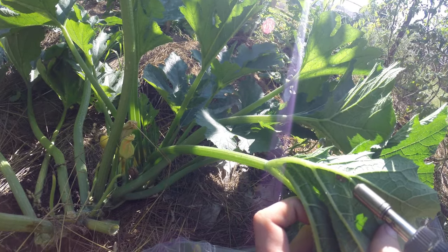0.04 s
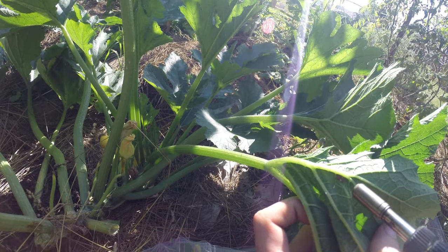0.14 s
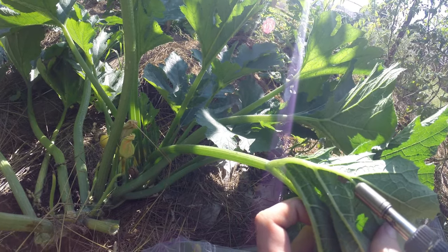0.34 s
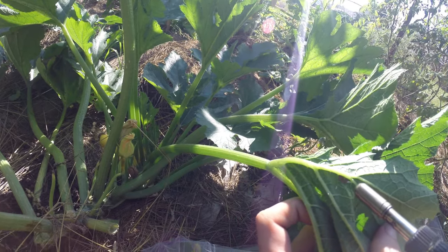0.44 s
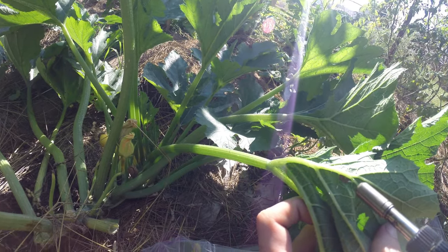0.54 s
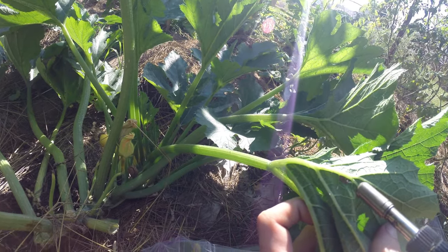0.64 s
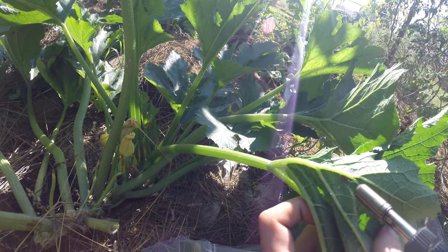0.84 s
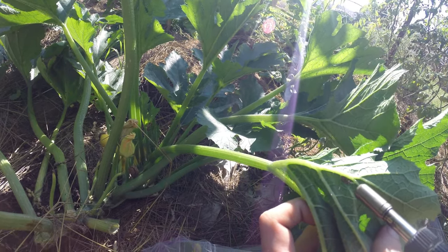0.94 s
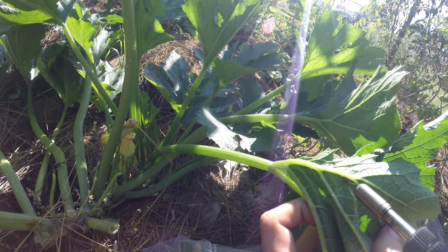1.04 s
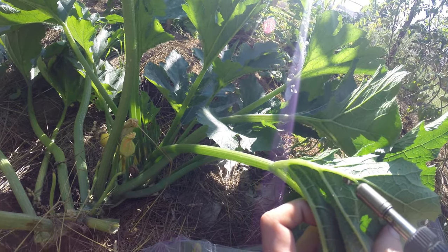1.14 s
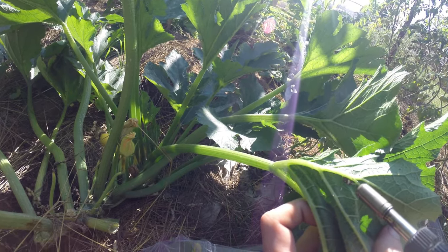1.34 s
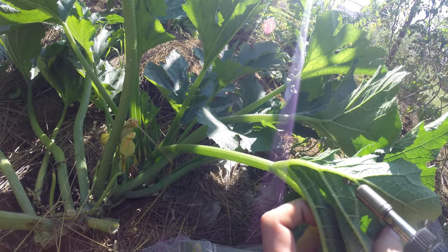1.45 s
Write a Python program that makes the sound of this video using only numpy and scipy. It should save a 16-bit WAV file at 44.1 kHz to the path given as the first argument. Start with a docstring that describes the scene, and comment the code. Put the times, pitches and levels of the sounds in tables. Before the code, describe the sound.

Insect eggs pop under a small gas torch, close and dry in open air. A faint tick at 0.15 s and a tiny rising bubble blip at 0.22 precede a loud crack at 0.35. Soft puffs follow around 0.42, a strong pop at 0.71, a dull puff at 0.8, faint ticks after 1.0, then the loudest tight double snap at 1.24 and a small puff at 1.31. Faint hiss, rumble and wavering hum continue throughout.

```python
"""Insect eggs burst on a garden leaf under a small gas torch: sharp cracks and dull puffs of steam.
Each burst is one prompt click, its spectrum shaped by crack, puff and short resonances.
Open air adds almost no tail; a sine blip rises in pitch, as of boiling sap.
The flame is shaped noise, hissing and roaring faintly throughout.
Below it lie an outdoor rumble of shaped noise and a wavering sine hum."""
import sys
import numpy as np
from scipy import signal
from scipy.fft import rfft, irfft
from scipy.io import wavfile
from scipy.ndimage import uniform_filter1d

SR = 44100
rng = np.random.default_rng(int(sys.argv[2]) if len(sys.argv) > 2 else 0)


def store_pcm(level_fs):
    """Save levels as 16-bit WAV."""
    pcm = np.round(np.clip(level_fs, -1, 1) * 32767).astype(np.int16)
    wavfile.write(sys.argv[1], SR, np.atleast_2d(pcm).T)


N = 66150  # samples, 1.5 s


def amp(db):
    """Decibels to gain."""
    return 10 ** (np.asarray(db) / 20)


def unit(x):
    """Scales to rms 1."""
    return x / np.sqrt(np.mean(x ** 2) + 1e-20)


def spectrum(points, hz):
    """Interpolates dB on a log-frequency axis."""
    point_hz, db = np.transpose(points)
    return np.interp(np.log(hz + 1), np.log(point_hz + 1), db)


def bumps(rows, hz):
    """Summed dB of resonance peaks and dips."""
    return sum(db / (1 + (2 * (hz - center_hz) / width_hz) ** 2) for center_hz, width_hz, db in rows)


def envelope(points, t):
    """Gain over time, interpolated in dB."""
    return amp(np.interp(t, *np.transpose(points)))


def drift(seconds):
    """Smooth random motion of rms 1: white noise averaged twice."""
    size = max(int(seconds * SR), 2)
    once = uniform_filter1d(rng.standard_normal(N), size)
    return unit(uniform_filter1d(once, size))


def noise(db):
    """Noise of rms 1 with the given spectral shape."""
    white = rng.standard_normal(N)
    return unit(irfft(rfft(white) * amp(db), N))


def causal(gain):
    """Minimum-phase spectrum: the most prompt click with this gain."""
    log_gain = np.log(np.maximum(gain, 1e-5))  # floor at -100 dB
    circle = np.concatenate([log_gain, log_gain[-2:0:-1]])
    return np.exp(np.conj(signal.hilbert(circle)))[:len(gain)]


def add(mix, start_s, sound):
    """Mixes a sound in at a time, cut at the end of the mix."""
    part = mix[round(start_s * SR):][:len(sound)]
    part += sound[:len(part)]


# Flame noise shape. Each row: frequency in Hz, relative density in dB.
FLAME_SHAPE = [(200, -11.5), (450, -3), (700, 0.5), (1050, -1.5), (1350, -9.5), (1750, -11), (2300, -18.5),
               (3400, -20), (4800, -15.5), (8200, -18.5), (12000, -22.5), (14500, -21.5), (15100, -34),
               (15600, -61)]
# Torch nozzle resonances and dips. Each row: center in Hz, width in Hz, height in dB.
NOZZLE_RESONANCES = [(3090, 170, 3.5), (3660, 78, 7.5), (4840, 480, 6.5), (5790, 240, 6), (7270, 980, 8.5),
                     (7940, 400, -9), (9330, 1040, 8), (11250, 540, 10), (12400, 400, -7),
                     (12700, 970, 4.5)]
# Gain of the high hiss band. Each row: time in seconds, gain in dB.
HISS_GAIN = [(0, -4.5), (.37, -2.5), (.55, 2), (.95, 2), (1.2, 4.5), (1.5, .2)]
FLAME_DB = -50  # rms before the hiss gain
HISS_HZ, HISS_WIDTH_HZ = 9440, 2100  # Gaussian band, full width at 1/e


def torch():
    """Gas noise coloured by flame and nozzle; the high hiss swells slowly."""
    hz, t = np.fft.rfftfreq(N, 1 / SR), np.arange(N) / SR
    flame = noise(spectrum(FLAME_SHAPE, hz) + bumps(NOZZLE_RESONANCES, hz))
    hiss_band = np.exp(-(2 * (hz - HISS_HZ) / HISS_WIDTH_HZ) ** 2)
    hiss = irfft(rfft(flame) * hiss_band, N)
    roar = flame - hiss
    return amp(FLAME_DB) * (roar + hiss * envelope(HISS_GAIN, t))


# Outdoor rumble shape. Each row: frequency in Hz, relative density in dB.
RUMBLE_SHAPE = [(10, -23), (25, -4), (42, -2), (70, 5), (95, -1), (160, -1.5), (220, -6), (330, -12.5),
                (600, -32), (2000, -55)]
# Hum level. Each row: time in seconds, rms level in dB.
HUM_LEVEL = [(0, -47.5), (.08, -45.5), (.2, -56), (.33, -61), (.45, -47.5), (.8, -51), (.99, -43.5),
             (1.25, -61), (1.4, -47), (1.5, -49.5)]
RUMBLE_DB, OCTAVE_DB = -48.5, -58  # rms
HUM_HZ, HUM_WAVER_RATIO, HUM_WAVER_S = 56.13, 0.0345, .08  # rms ratio, averaging time


def outdoors():
    """Noise rumble, and a sine hum of wavering pitch with a weak steady octave."""
    hz, t = np.fft.rfftfreq(N, 1 / SR), np.arange(N) / SR
    pitch_hz = HUM_HZ * (1 + HUM_WAVER_RATIO * drift(HUM_WAVER_S))
    phase = 2 * np.pi * np.cumsum(pitch_hz) / SR
    fundamental = envelope(HUM_LEVEL, t) * np.sin(phase)
    octave = amp(OCTAVE_DB) * np.sin(2 * phase)
    rumble = amp(RUMBLE_DB) * noise(spectrum(RUMBLE_SHAPE, hz))
    return np.sqrt(2) * (fundamental + octave) + rumble  # sqrt(2): rms to sine peak


# Broad colour of a burst. Each row: frequency in Hz, gain in dB.
BURST_COLOUR = [(40, -31), (150, -0.5), (400, 8.5), (850, 12.5), (1500, 8.5), (2700, 4), (4200, 11.5),
                (5000, 11), (5600, 0), (8500, 2), (11500, 6), (13500, 1), (15000, -11), (16000, -21)]
# Resonances and dips of leaf and camera housing. Each row: center in Hz, width in Hz, height in dB.
BODY_RESONANCES = [(762, 82, 2), (1746, 170, 3.5), (2210, 145, -8.5), (2455, 110, -13.5), (3063, 210, 7),
                   (3220, 83, -15), (3650, 124, 3), (3810, 110, -9), (4430, 140, -4), (6420, 120, -6),
                   (7280, 490, 6.5), (8950, 500, -10.5), (9840, 350, 5.5), (12300, 240, -9)]
SMEAR_HZ, SMEAR_WIDTH_HZ = 5000, 3300  # the housing delays this band by a fraction of a millisecond
PUFF_SLOPE, CRACK_SLOPE = 1.68, 3.5  # steepness of the puff's skirts, of the crack's treble fall


def pop(crack_db, corner_hz, puff_db, puff_hz, puff_sharpness, size=4096):
    """The shell cracks and steam puffs out; both ring the same short resonances."""
    hz = np.fft.rfftfreq(size, 1 / SR) + 1e-3  # offset avoids division by zero
    crack = amp(crack_db) / np.hypot(1, (hz / corner_hz) ** CRACK_SLOPE)
    detune = puff_sharpness * (hz / puff_hz - puff_hz / hz)
    puff = amp(puff_db) / np.hypot(1, detune) ** (2 * PUFF_SLOPE)
    colour = amp(spectrum(BURST_COLOUR, hz) + bumps(BODY_RESONANCES, hz))
    # all-pass, applied twice
    smear = np.exp(-2j * np.arctan2(hz * SMEAR_WIDTH_HZ, SMEAR_HZ ** 2 - hz ** 2))
    click = irfft(causal(np.hypot(crack, puff) * colour) * smear ** 2)
    return click[:size // 2]


# Bursting eggs. Each row: start in seconds, crack level in dB before colour, crack treble corner in Hz,
# puff level in dB before colour, puff center in Hz, puff sharpness (no unit).
BURSTS = [(0.1466, -31.5, 9000, -42, 900, .6), (0.3538, 4.5, 8800, 3, 670, 0.7),
          (0.4157, -33, 6000, -13.5, 547, 0.65), (0.4187, -27.5, 10000, -25, 900, 0.55),
          (0.6947, -26, 14000, -22, 800, 0.94), (.7067, -4.4, 8500, -.5, 825, .95),
          (.7970, -40, 3000, -8, 455, .75), (1.0183, -30.5, 4500, -27.5, 1390, 0.76),
          (1.1100, -32.5, 7000, -34, 900, .6), (1.2125, -19.5, 14000, -10.5, 560, 0.9),
          (1.2382, -0.96, 11500, 0, 1010, 1), (1.2455, 1, 14500, 2, 890, 1),
          (1.3078, -27.5, 11100, -7, 690, .38)]
BLIP_START_S = .2214


def eggs():
    """All the bursts, and the one blip."""
    out = np.zeros(N)
    for start_s, *burst in BURSTS:
        add(out, start_s, pop(*burst))
    add(out, BLIP_START_S, blip())
    return out


GARDEN_DB, GARDEN_T60_S = -16.5, 0.025  # tail energy relative to direct sound, 60 dB decay time


def garden(x):
    """Faint scatter from leaves and soil: convolution with decaying noise."""
    t = np.arange(SR // 2) / SR
    tail = rng.standard_normal(len(t)) * np.exp(-np.log(1000) * t / GARDEN_T60_S)
    return amp(GARDEN_DB) * signal.fftconvolve(x, tail / np.linalg.norm(tail))[:N]


BLIP_DB, BLIP_SWELL_S = -19.5, 0.0016  # level, time to the swell's peak
BLIP_HZ, BLIP_RISE_HZ_PER_S = 569, 67500
BLIP_OVERTONE_HZ, BLIP_OVERTONE_DB = 1880, -22  # dB relative to the ring


def blip():
    """A bubble of sap rings softly, rising in pitch, with a weak fixed overtone."""
    t = np.arange(SR // 50) / SR
    swell = (t / BLIP_SWELL_S * np.exp(1 - t / BLIP_SWELL_S)) ** 2
    pitch_hz = BLIP_HZ + BLIP_RISE_HZ_PER_S * t
    ring = np.sin(2 * np.pi * np.cumsum(pitch_hz) / SR)
    overtone = amp(BLIP_OVERTONE_DB) * np.sin(2 * np.pi * BLIP_OVERTONE_HZ * t)
    return amp(BLIP_DB) * swell * (ring + overtone)


def scene():
    """Bursts with their garden scatter, torch and outdoors, in mono."""
    bursts = eggs()
    return (bursts + garden(bursts) + torch() + outdoors())[None]


EDGE_HZ = 16500


def record(dry):
    """The recorder's band limit: a linear-phase low-pass."""
    lowpass = signal.firwin(511, EDGE_HZ, window=("kaiser", 9), fs=SR)
    return signal.oaconvolve(dry, lowpass[None], "same")


dry = scene()
out = record(dry)
store_pcm(out)
```